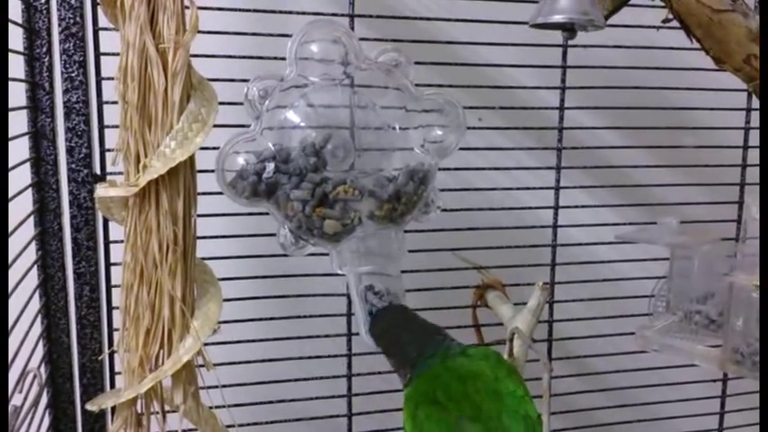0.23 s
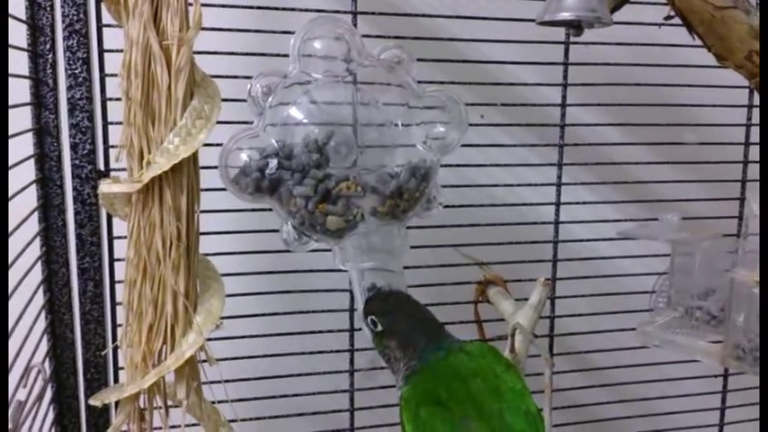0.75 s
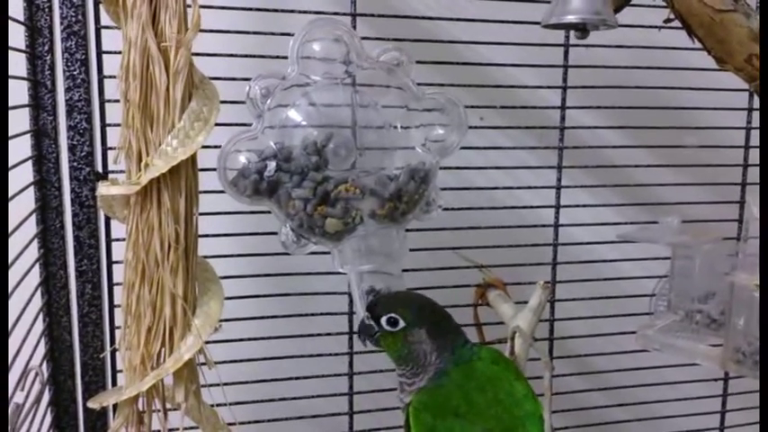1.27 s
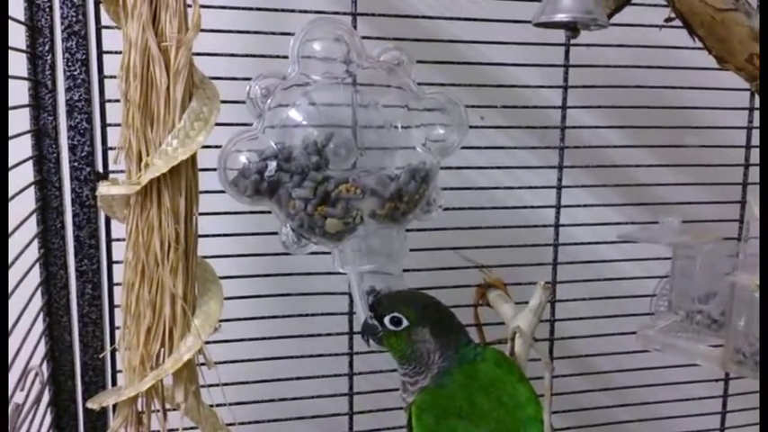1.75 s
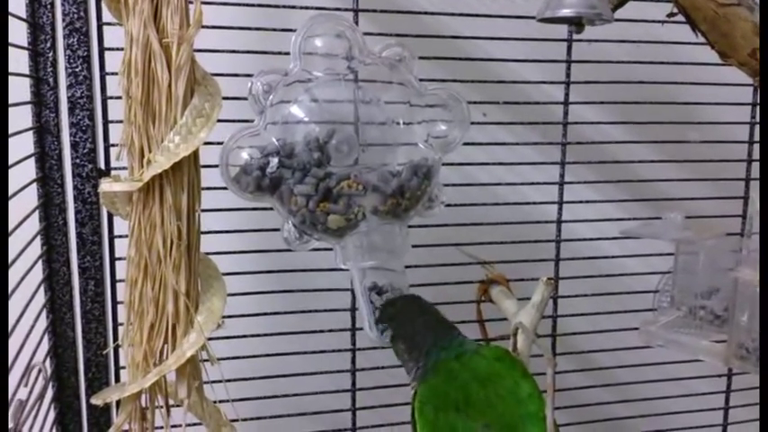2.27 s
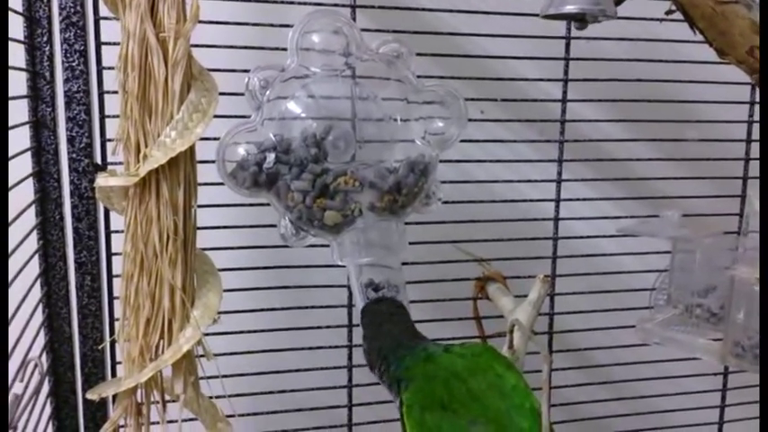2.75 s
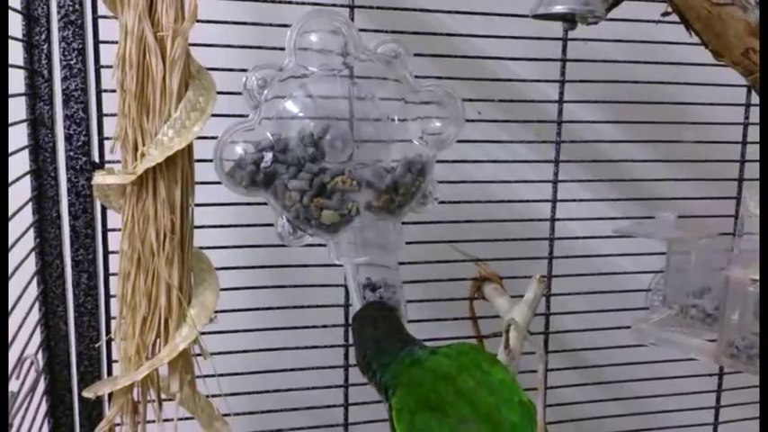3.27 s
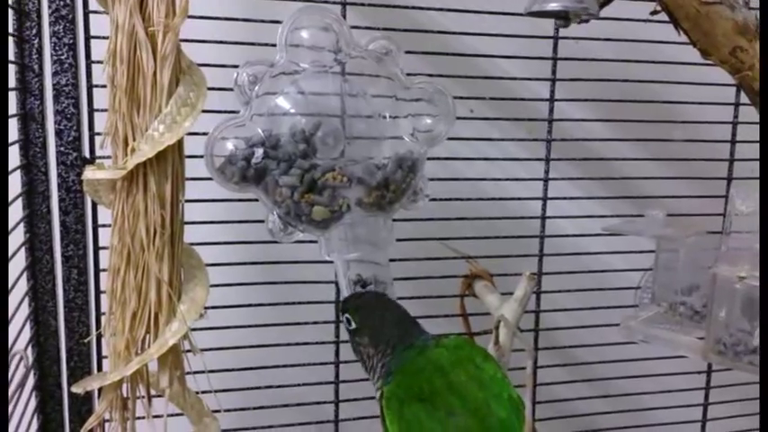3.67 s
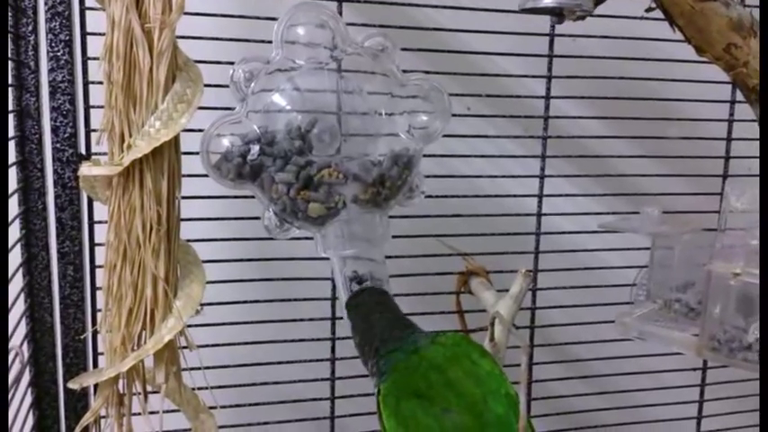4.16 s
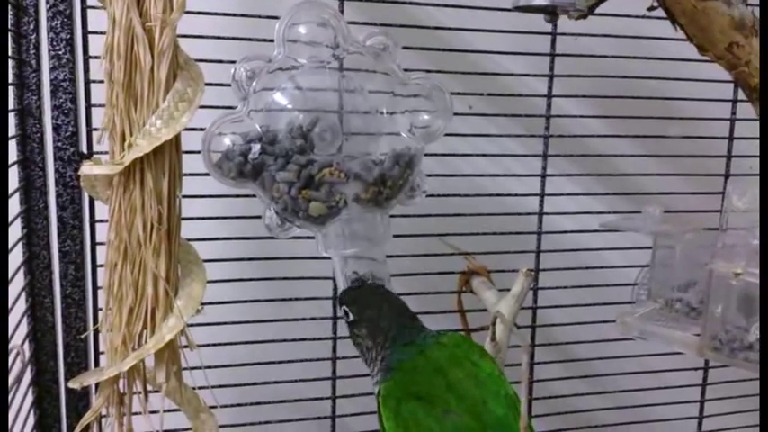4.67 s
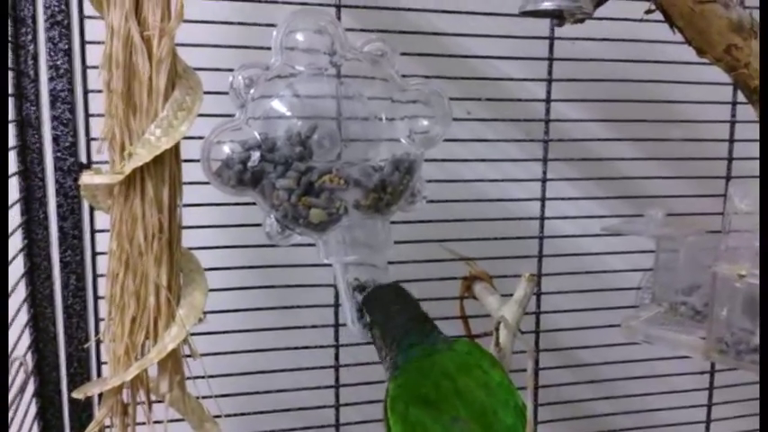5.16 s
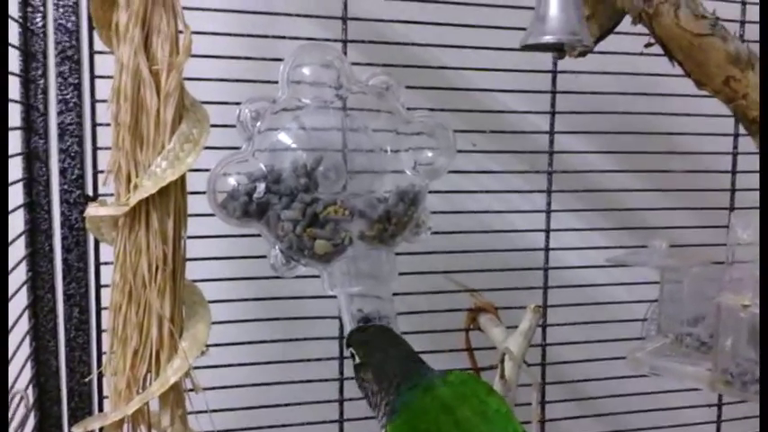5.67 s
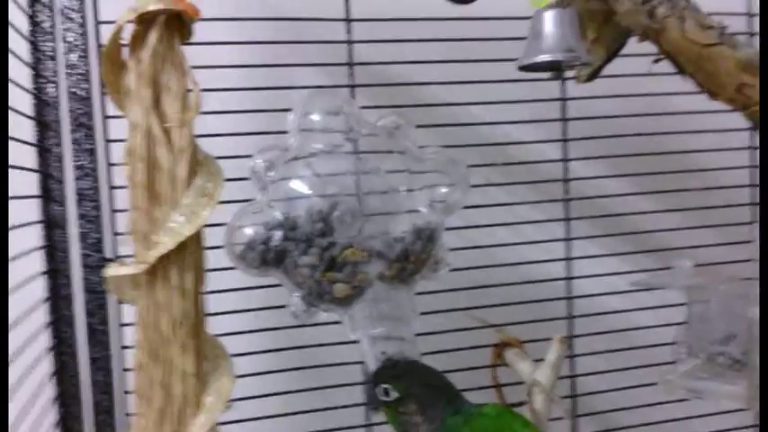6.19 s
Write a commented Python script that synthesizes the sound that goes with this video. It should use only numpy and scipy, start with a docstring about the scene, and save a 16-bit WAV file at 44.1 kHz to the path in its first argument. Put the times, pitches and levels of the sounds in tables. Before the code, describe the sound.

Close dry clicks of a beak on a plastic shell, scattered from start to near the end. A cage rattle comes first, then a loud rough screech from another bird with two weaker afterthoughts, and a cluster of metallic knocks. Quiet spells follow, with clicks, tiny sliding chirps, a barely audible purr and a thin rasp. Indoor reverberation, low handling rumble and final deep thumps on the microphone.

```python
"""A small parrot nibbles at a clear plastic tumbler toy in a wire cage, in a live room with a faint hiss.
Beak clicks (noise bursts through shell resonances) come from the start until shortly before the last hand
bumps. Early on a parrot further off screeches, grumbles and mutters (rough pulses), and knocks rattle the
cage (noise and ringing wires). Later the near bird chuckles (sliding notes) and purrs, and the far one rasps.
Now and then fingers rub and bump on the hand-held camera (rumble, slips, pressure pulses), most at the end."""
import sys
import numpy as np
from scipy import signal
from scipy.fft import rfft, irfft, next_fast_len
from scipy.io import wavfile

SR = 44100
rng = np.random.default_rng(int(sys.argv[2]) if len(sys.argv) > 2 else 0)


def bounce(signal):
    """Save signal as a 16-bit WAV file at the path given by the first command-line argument."""
    frames = np.transpose(np.atleast_2d(signal))
    limited = np.clip(frames, -1, 1)
    pcm = np.round(limited * 32767).astype(np.int16)
    wavfile.write(sys.argv[1], SR, pcm)


N = 283541
TIME = np.arange(N) / SR   # seconds

# Low rumble, of the room and of the hand. Each row: frequency in Hz, relative level in dB.
RUMBLE = [(15, 4), (30, -1.5), (60, -11), (110, -22.5), (200, -34), (400, -60), (1500, -100)]


def from_db(db):
    """Turn decibels into a gain."""
    return 10 ** (np.asarray(db) / 20)


def rms_one(x):
    """Scale to unit power."""
    return x / np.sqrt(np.mean(x ** 2) + 1e-20)


def at_hz(points, hz):
    """Read a table between its rows, along a logarithmic frequency axis."""
    table_hz, value = np.transpose(points)
    return np.interp(np.log(np.maximum(hz, 1)), np.log(table_hz), value)


def coloured(x, spectrum):
    """Make some frequencies stronger than others, then scale to unit power."""
    length = x.shape[-1]
    size = next_fast_len(length)
    gain = from_db(at_hz(spectrum, np.fft.rfftfreq(size, 1 / SR)))
    return rms_one(irfft(rfft(x, size) * gain, size)[..., :length])


def wander(rate_hz, size):
    """Smooth random drift around zero, of unit power: noise without its changes faster than rate_hz."""
    sos = signal.butter(2, rate_hz, fs=SR, output="sos")
    drift = signal.sosfilt(sos, rng.standard_normal(2 * size))
    return rms_one(drift[size:])   # skip the filter's start


def panned(left_db):
    """Gains of the left and right channel, the left one stronger by left_db."""
    gains = from_db(np.array([[left_db], [-left_db]]) / 2)
    return gains / np.sqrt(np.mean(gains ** 2))


def add(out, s, sound):
    """Mix a sound in at s seconds."""
    start = max(0, round(s * SR))
    part = sound[..., :max(0, N - start)]
    out[..., start:start + part.shape[-1]] += part


def resonate(x, hz, width_hz):
    """Let one frequency ring: a resonance with gain 1 on top; a narrow one rings longer."""
    r = np.exp(-np.pi * width_hz / SR)
    forward = np.array([1, 0, -1]) * (1 - r * r) / 2
    feedback = [1, -2 * r * np.cos(2 * np.pi * hz / SR), r * r]
    return signal.lfilter(forward, feedback, x)


def ringing(modes):
    """One second of dying sine tones from a struck body, of different strength at either microphone."""
    t, out = TIME[:SR], 0
    for hz, db, t60 in modes:   # t60: seconds to fall by 60 dB
        level_db = db + rng.normal(0, 2, (2, 1)) - 60 * t / t60
        sign = rng.choice([-1, 1], (2, 1))
        out = out + from_db(level_db) * np.sin(2 * np.pi * hz * t) * sign
    return out


def room(x, build_s=0.011):
    """Diffuse echoes: bands of noise build up quickly and each dies at its own speed."""
    # Each row: frequency in Hz, time to fall by 60 dB in seconds.
    fall_times = [(200, 1), (600, 0.52), (1500, 0.75), (3700, 0.57), (7500, 0.59), (14000, 0.39)]
    # Colour of the echoes. Each row: frequency in Hz, relative level in dB.
    echo_colour = [(100, -10.5), (500, 2), (1800, -0.5), (4000, -1.5), (7500, -3), (9000, 3), (11000, -4),
                   (15000, -12)]
    t, tail = TIME[:SR], 0
    edges = np.geomspace(100, 16000, 16)   # Hz
    for low, high in zip(edges, edges[1:]):
        hz = np.sqrt(low * high)
        sos = signal.butter(2, [low, high], "band", fs=SR, output="sos")
        band = signal.sosfilt(sos, rng.standard_normal((2, SR)))
        fade = np.exp(-np.log(1000) * t / at_hz(fall_times, hz))
        tail = tail + band * from_db(at_hz(echo_colour, hz)) * fade
    build_up = 1 - np.exp(-(t / build_s) ** 2)
    tail = rms_one(tail * build_up) / np.sqrt(2 * SR)
    return signal.fftconvolve(x, tail, axes=-1)[:, :N]


def near_walls(x, echo_db, fade_s):
    """The straight path and a spray of early echoes, different at each microphone."""
    t = TIME[:SR // 25]
    spray = rms_one(rng.standard_normal((2, len(t))) * np.exp(-t / fade_s))
    paths = from_db(echo_db) * spray / np.sqrt(len(t))
    paths[:, 0] += 1   # the straight path
    paths = paths / np.sqrt(1 + from_db(echo_db) ** 2)
    return signal.fftconvolve(x[None], paths, axes=-1)[:, :N]


def call(rows, throat, jitter, tripling, rasp, flutter_db):
    """Syrinx pulses; roughness makes them stagger, vary over three cycles and shed turbulent noise."""
    s, *columns = np.transpose(rows)
    t = np.arange(s[0], s[-1], 1 / SR)
    pitch, level_db, rough = [np.interp(t, s, column) for column in columns]
    rough, size = np.clip(rough, 0, 1), len(t)
    waver = .024 * wander(45, size)
    stagger = 1 + rough * (waver + jitter * wander(500, size))
    phase = 2 * np.pi * np.cumsum(pitch * stagger) / SR
    third = phase / 3 + wander(60, size)   # one turn takes about three cycles
    phase = phase + tripling * rough * np.sin(third)
    overtones = [np.cos(k * phase + rng.uniform(0, 2 * np.pi)) for k in range(1, 13)]
    pulses = rms_one(sum(overtones))
    # the noise comes in puffs, one per cycle
    turbulence = rasp * rough * rng.standard_normal(size) * (1 + np.cos(phase))
    flutter = from_db(flutter_db * rough * wander(440, size))
    voice = coloured(pulses + turbulence, throat) * flutter
    out = np.zeros(N)
    add(out, s[0], rms_one(voice) * from_db(level_db))
    return out


def glides(notes, overtone_db):
    """Very short, nearly pure sliding notes, each with one weak overtone."""
    out = np.zeros(N)
    for s, length, start_hz, end_hz, db in notes:
        progress = np.linspace(0, 1, max(8, round(length * SR)))
        phase = 2 * np.pi * np.cumsum(start_hz + (end_hz - start_hz) * progress) / SR
        tone = np.sin(phase) + from_db(overtone_db) * np.sin(2 * phase)
        swell = np.sqrt(2 * abs(np.sin(np.pi * progress)))
        add(out, s, from_db(db) * swell * tone)
    return out


def room_air(hiss_db=-73.5, rumble_db=-57.5):
    """Steady coloured noise: the hiss of the still room and its low rumble."""
    # Each row: frequency in Hz, relative level in dB.
    hiss_colour = [(120, -32), (200, -4), (700, -10), (2000, -14.5), (8000, -20.5), (11500, -16.5),
                   (13000, -24.5), (15400, -37.5)]
    hiss = from_db(hiss_db) * coloured(rng.standard_normal((2, N)), hiss_colour)
    return hiss + from_db(rumble_db) * coloured(rng.standard_normal((2, N)), RUMBLE)


def handling(drain_hz=55.16):
    """Fingers press near the left microphone: rumble, small slips, creaks and sharp pressure bumps."""
    # The fingers shift their grip on the camera.
    # Each row: start in seconds, length in seconds, rumble in dB, rubbing in dB.
    grips = [(.05, .3, -51, -68), (.59, .32, -36.5, -69), (2.61, .17, -45, -78), (3.44, .48, -43, -67),
             (4.17, .3, -36, -73.5), (5.0, 1.03, -36, -62), (6.1, .2, -32, -55)]
    # Sharp bumps on the camera body. Each row: time in seconds, peak pressure in dB before it leaks away.
    bump_list = [(.619, -31), (.746, -33), (.874, -26), (2.628, -36), (2.696, -38), (4.214, -30),
                 (5.022, -29), (5.188, -31), (5.382, -26), (5.84, -29), (6.148, -3), (6.252, -11),
                 (6.416, -14.5)]
    # Skin creaking on the case. Each row: start in seconds, level in dB.
    creak_list = [(2.649, -54), (5.623, -54.5), (5.652, -53.5), (6.077, -55), (6.102, -54)]
    # Rubbing sound. Each row: frequency in Hz, relative level in dB.
    rubbing_colour = [(60, -9), (130, -5.5), (250, -5.5), (500, -21), (900, -34.5), (2500, -58),
                      (8000, -85.5)]
    # A fingernail on the case: start in seconds, level in dB before it fades.
    tick_s, tick_db = (6.148, -19)
    attack_s, release_s = .035, .1   # how gradually a grip comes and goes
    slips_per_s, bump_half_width_s = 70, .0016
    creak_s, creak_start_hz, creak_end_hz = .007, 545, 595

    rumble, rubbing = from_db(-56), from_db(-88)   # the hand held still
    for s, length, rumble_db, rubbing_db in grips:
        before, after = np.maximum(s - TIME, 0), np.maximum(TIME - s - length, 0)
        grip = np.exp(-before / attack_s - after / release_s)
        rumble = np.maximum(rumble, from_db(rumble_db) * grip)
        rubbing = np.maximum(rubbing, from_db(rubbing_db) * grip)
    tremor = from_db(2 * wander(7, N))   # uneven finger pressure: 2 dB spread, slower than about 7 Hz
    hand = rumble * tremor * coloured(rng.standard_normal((2, N)), RUMBLE)
    slips = (rng.random(N) < slips_per_s / SR) * rng.standard_normal(N)
    hand += rubbing * coloured(slips, rubbing_colour)

    pressure = sum(from_db(db) / (1 + ((TIME - at) / bump_half_width_s) ** 2) for at, db in bump_list)
    # the pressure leaks away and swings back
    bumps = signal.lfilter(*signal.butter(1, drain_hz, "high", fs=SR), pressure)
    t = TIME[:SR // 50]
    tick = -from_db(tick_db) * np.exp(-t / 0.00056) * np.sin(2 * np.pi * 800 * t)
    add(bumps, tick_s, tick)
    creak_notes = [(s, creak_s, creak_start_hz, creak_end_hz, db) for s, db in creak_list]
    creaks = glides(creak_notes, overtone_db=-18.)
    return panned(20) * hand + panned(30) * (bumps + creaks)


def effort(row):
    """A call swells, holds and dies away; with less effort its pitch sags and the voice frays."""
    s, held_s, hz, rise, db, rough, clean_s = row
    attack_s, onset_db = .024, -40
    tail_s, release_db_per_s = .11, 300
    sag_hz_per_db, fray_per_db = 3, .025
    clean_roughness, break_s = .17, .008   # the clean opening, and how fast the voice breaks at its end
    t = np.arange(-attack_s, held_s + tail_s, 1 / SR)
    onset = onset_db * (np.minimum(t, 0) / attack_s) ** 2
    drop_db = onset - release_db_per_s * np.maximum(t - held_s, 0)
    swell_db = 3 * np.clip(2 * t / held_s - 1, -1, 0)   # full strength halfway through
    pitch = hz + rise * np.minimum(t, held_s + tail_s / 2) + sag_hz_per_db * drop_db
    roughness = np.interp(t, [clean_s - break_s, clean_s], [clean_roughness, rough])
    roughness = roughness - fray_per_db * drop_db
    # each row: seconds, pitch in Hz, level in dB, roughness
    return np.column_stack([s + t, pitch, db + drop_db + swell_db, roughness])


def far_parrot(howl_db=-9.5):
    """A harsh screech that sets the cage howling, two softer afterthoughts, the first higher, and a rasp."""
    # Four calls. Each: start in seconds, held time in seconds, pitch in Hz, pitch rise in Hz per second,
    # level in dB at full strength, roughness from 0 to 1, clean opening in seconds.
    screech = (.628, .16, 1205, 260, -15.7, .78, .016)
    grumble = (.931, .035, 1425, 3200, -26.2, .66, 0)
    mutter = (1.153, .024, 1240, 200, -35.5, .72, 0)
    thin_rasp = (5.497, .03, 1145, -200, -45.5, .92, 0)
    # Colour of throat and beak. Each row: frequency in Hz, relative level in dB.
    wide_beak = [(700, -62), (1200, -28), (1600, -13), (2100, -12), (2450, -9.5), (2850, -6), (3700, -2.5),
                 (4150, 0.5), (4900, -6.5), (5600, -7), (6800, -11.5), (7500, -4), (8700, -16),
                 (10000, -18.5), (11500, -26), (15000, -41)]
    half_beak = [(800, -44.5), (1450, -15.5), (2000, -1.5), (2700, -5), (4200, -3), (5400, -16),
                 (7500, -13.5), (9000, -23), (15000, -54)]
    shut_beak = [(900, -20), (1900, -4.5), (2450, -3.5), (3300, -7.5), (4100, -9), (4500, 3.5), (5000, -2),
                 (5700, -10.5), (6700, -15.5), (7100, -2), (7500, -3.5), (8000, -1.5), (8600, -21),
                 (11000, -18.5), (15000, -46)]
    # Narrow resonances of the cage that the screech sets ringing.
    # Each row: frequency in Hz, width in Hz, relative level in dB.
    howl_modes = [(2364, 60, -3.5), (2710, 18, -6), (2930, 25, 3), (3678, 15, 5.5), (4040, 16, 11.5),
                  (6400, 25, -1.5), (6960, 24, 3)]
    voice = call(effort(screech), wide_beak, jitter=.03, tripling=.55, rasp=0.94, flutter_db=1.5)
    howl = sum(from_db(db) * resonate(voice, hz, width) for hz, width, db in howl_modes)
    howl = from_db(howl_db) * howl
    voice += call(effort(grumble), half_beak, jitter=0.059, tripling=0.24, rasp=1.0, flutter_db=5.0)
    voice += call(effort(mutter), half_beak, jitter=0.046, tripling=0.67, rasp=0.77, flutter_db=-2.0)
    voice += call(effort(thin_rasp), shut_beak, jitter=.05, tripling=.3, rasp=1.1, flutter_db=3.5)
    early = near_walls(voice, echo_db=7.5, fade_s=0.0064)
    late = from_db(-0.5) * room((voice + howl)[None])
    return panned(-8.5) * (early + howl + late)


def cage_knocks(wire_db=-13.):
    """The cage shudders at each knock (fading noise) and its wires ring on; the perch gets a faint tap."""
    # Each row: start in seconds, level in dB, fading time of the shudder in seconds,
    # wire ring in dB against the knock, before wire_db.
    knocks = [(.002, -45, 0.05, 7.5), (.087, -35, 0.012, -3), (1.319, -36, 0.016, -4),
              (1.34, -28.5, 0.0069, -10.5), (1.392, -32, 0.012, -10.5)]
    # The struck cage. Each row: frequency in Hz, relative level in dB.
    cage_colour = [(100, -53), (200, -27.5), (330, -8.5), (650, -3.5), (1000, -12.5), (2600, -0.5),
                   (4200, -3), (6000, -6), (8000, -14), (11000, -24), (15000, -32)]
    # Cage wires. Each row: frequency in Hz, relative level in dB, time to fall by 60 dB in seconds.
    wire_modes = [(310, -6, .8), (410, -9.5, 0.42), (480, -7, 0.81), (560, -11, 0.17), (646, -4, .72),
                  (780, -4.5, .9), (1195, -6.5, .47), (1669, -6.5, .5), (1782, -9.5, 0.7), (2320, -6, 0.61),
                  (2650, 0.5, 0.46), (3546, -11, 0.73)]
    # Tap on the perch: start in seconds, level in dB.
    tap_s, tap_db = (2.507, -52)
    # The perch. Each row: frequency in Hz, relative level in dB, time to fall by 60 dB in seconds.
    perch_modes = [(854, -3, 0.16), (1420, -5, 0.12), (1750, -11.5, 0.06)]
    t, shudders, wires = TIME[:SR], np.zeros((2, N)), np.zeros((2, N))
    for s, db, shudder_s, ring_db in knocks:
        rattle = coloured(rng.standard_normal((2, SR)), cage_colour)
        add(shudders, s, from_db(db) * rattle * np.exp(-t / shudder_s))
        add(wires, s, from_db(db + ring_db + wire_db) * ringing(wire_modes))
    add(wires, tap_s, from_db(tap_db) * ringing(perch_modes))
    return panned(-6.5) * (shudders + wires + room(shudders))


def chuckle():
    """The near bird's quiet, quick sliding notes and its faint purr, broken up by a flickering level."""
    # Each row: start in seconds, length in seconds, start pitch in Hz, end pitch in Hz, level in dB.
    chuckle_notes = [(3.567, .008, 1400, 1444, -51), (3.687, .008, 1590, 1500, -44),
                     (3.707, .012, 1350, 1590, -44), (3.73, .009, 1735, 1380, -43),
                     (3.755, .012, 1640, 1270, -45), (3.792, .008, 1470, 1455, -53)]
    # The purr. Each row: time in seconds, pitch in Hz, level in dB before the flicker,
    # roughness (capped at 1).
    purr_path = [(5.14, 1086, -81, 0.98), (5.16, 1070, -57, 1.04), (5.25, 1029, -71.5, 0.79),
                 (5.35, 1201, -62, 1), (5.39, 1480, -65, 1.1), (5.46, 1487, -69.5, 1)]
    # Colour of the closed throat. Each row: frequency in Hz, relative level in dB.
    closed_throat = [(600, -19), (1100, -5), (1600, -11), (2400, -15.5), (5000, -9), (12000, -31.5)]
    notes = glides(chuckle_notes, overtone_db=-28.)
    purr = call(purr_path, closed_throat, jitter=.08, tripling=.35, rasp=.5, flutter_db=4.)
    flicker = from_db(3.5 * wander(40, N) - 2.5)
    notes += purr * flicker
    return panned(-13.5) * (notes + from_db(-10.5) * room(notes[None]))


def beak_clicks(slip_db=-7., bite_s=0.00038, gain_db=-2.0):
    """The beak snaps off the plastic and catches again a moment later; the shell rings briefly."""
    # Each row: start in seconds, level in dB before gain_db, hollow body in dB, treble in dB,
    # sound sent to the room in dB.
    touches = [(.084, -32, 7, 4, -3), (.227, -42, -1, -3, -5), (.28, -47, -3, -3, 2),
               (.342, -46.5, 8, 3, -6), (.359, -47.5, -4, 0, -4), (.575, -53, 12, -24, -2),
               (1.016, -24, 2, 5, -8), (1.105, -32.5, -4, -24, -6), (2.814, -57, -17, -4, -14),
               (2.861, -55, -1, -14, -10), (2.905, -57, -12, -22, -20), (3.405, -32.5, -1, -8, -5),
               (3.602, -34, -4, -5, -3), (3.974, -54, -10, 4, 0), (4.181, -25.5, 1.5, -4.5, -6.5),
               (4.428, -41.5, 8, -28, -6), (4.484, -51.5, 1, -12, -3), (4.613, -39.5, -9, -6, -3),
               (4.827, -55, 5, -1, -8), (5.125, -38.5, -36, 2, -5), (5.58, -36, -26, -3, -3)]
    # Resonances of the plastic shell, each passed twice.
    # Each row: frequency in Hz, width of one pass in Hz, relative level in dB.
    shell_modes = [(650, 650, 7.5), (1495, 750, 4.5), (2560, 2300, 0.5), (3900, 1500, 2.5),
                   (5050, 1100, 2.5), (6900, 1900, -1), (10500, 4500, -14.5)]
    ring_s, bass_db = .0043, -8.5   # fading time of a snap; the lowest mode against the hollow body
    t, direct, sent = TIME[:SR // 10], np.zeros((2, N)), np.zeros((2, N))
    for s, db, body_db, treble_db, room_db in touches:
        firm = np.clip((db + 59.5) / 30, 0, 1)   # light touches catch again only weakly
        snap = np.exp(-t / ring_s)
        catch = (t > ring_s) * np.exp(-abs(t - ring_s) / ring_s * 2)
        force = snap + firm * from_db(slip_db) * catch
        force = force * (1 - np.exp(-t / bite_s))   # softens the very start
        # where and how hard the beak lands decides which modes speak
        touch = [(650, body_db + bass_db), (1450, body_db), (2600, 0), (3900, 0), (6900, treble_db)]
        click = 0
        for hz, width, level in shell_modes:
            crack = rng.standard_normal((2, len(t))) * force
            ring = resonate(resonate(crack, hz, width), hz, width)
            click = click + from_db(level + at_hz(touch, hz)) * ring
        opening_rms = np.sqrt(np.mean(click[:, :SR // 200] ** 2))   # first 5 ms
        click = click / opening_rms * from_db(db + gain_db)
        add(direct, s, click)
        add(sent, s, click * from_db(room_db))
    return panned(-6.5) * direct + panned(-8.5) * room(sent)


def scene():
    """Room, hand, birds, cage and toy together."""
    return room_air() + handling() + far_parrot() + cage_knocks() + chuckle() + beak_clicks()


def record(dry):
    """Full scale limits the peaks; the top is cut, by 60 dB from 16 kHz up."""
    limited = np.clip(dry, -1, 1)
    return signal.sosfilt(signal.cheby2(14, 60, 16000, fs=SR, output="sos"), limited)


dry = scene()
out = record(dry)
bounce(out)
```